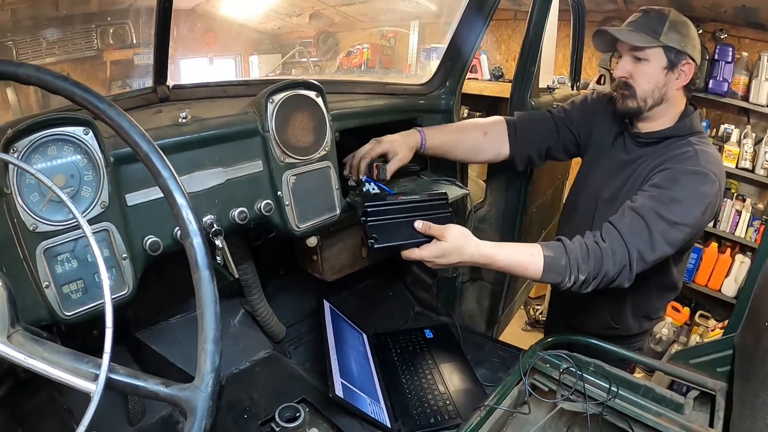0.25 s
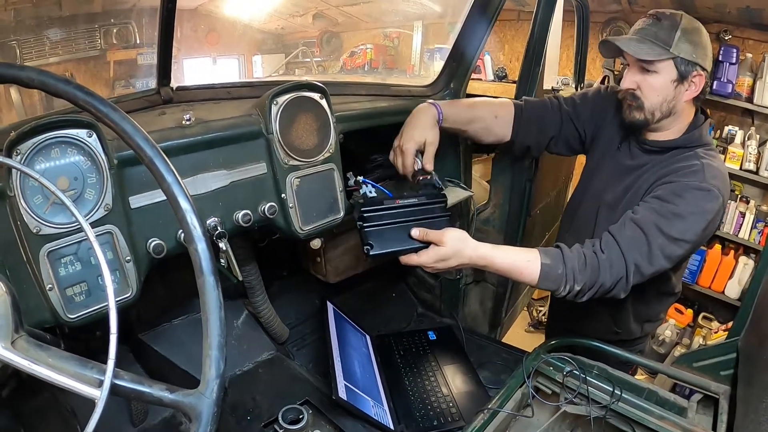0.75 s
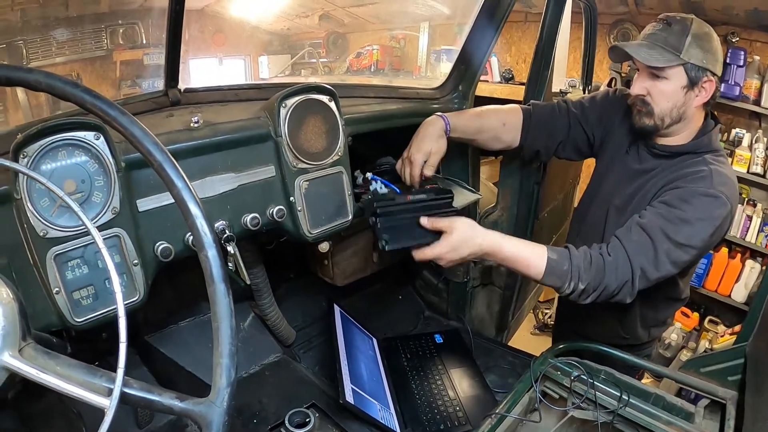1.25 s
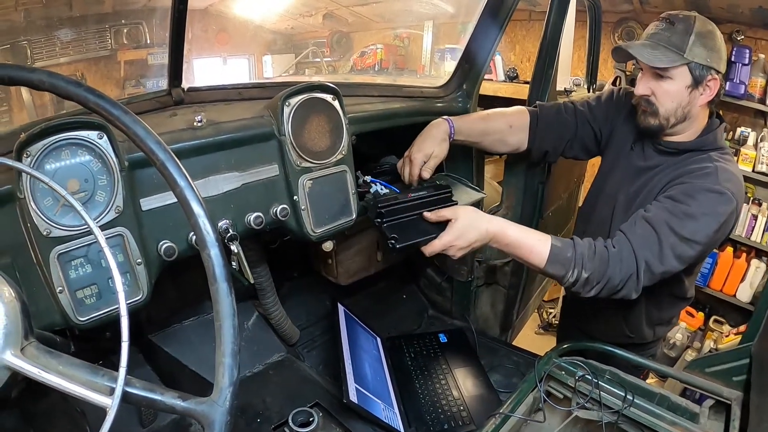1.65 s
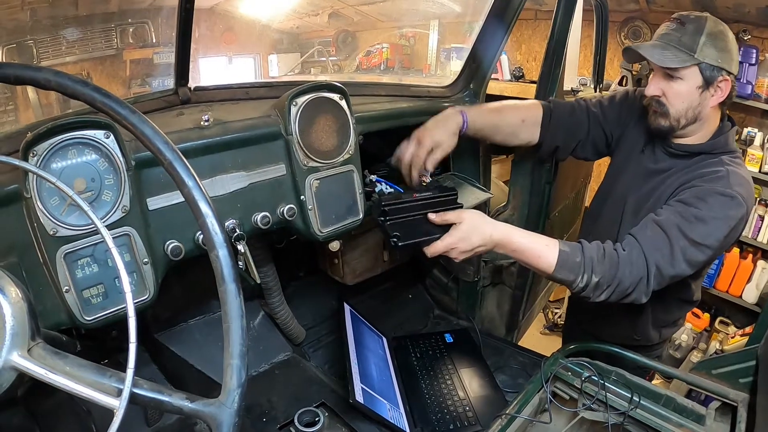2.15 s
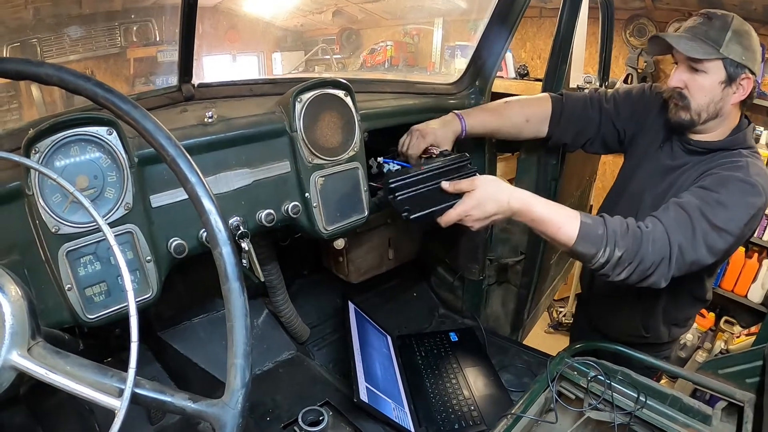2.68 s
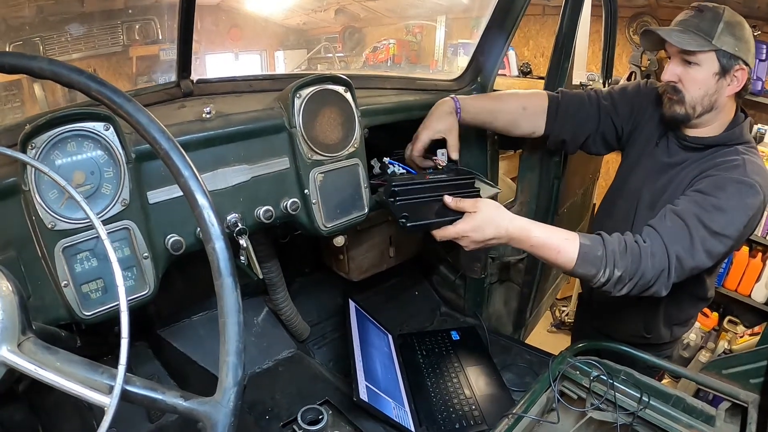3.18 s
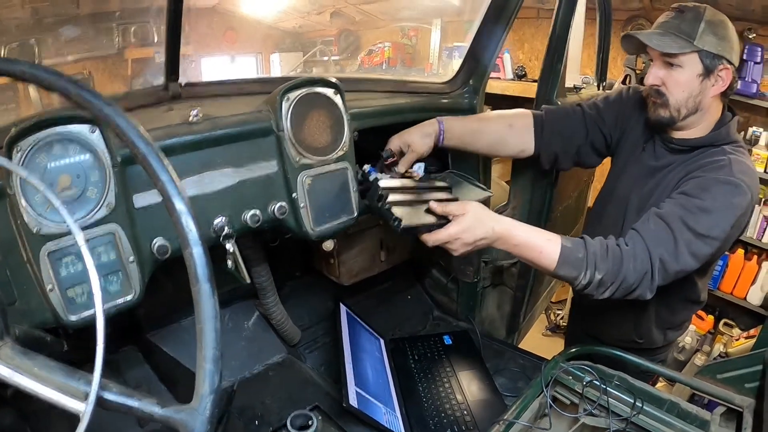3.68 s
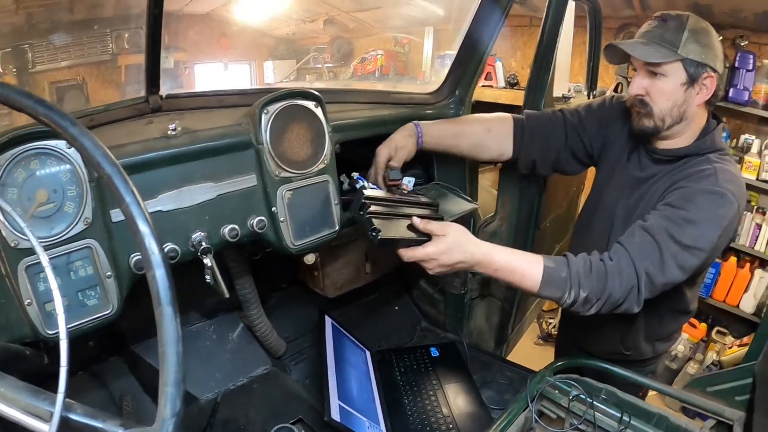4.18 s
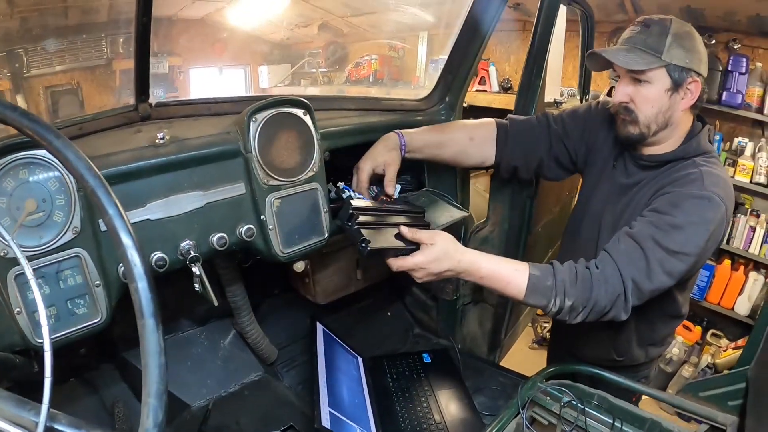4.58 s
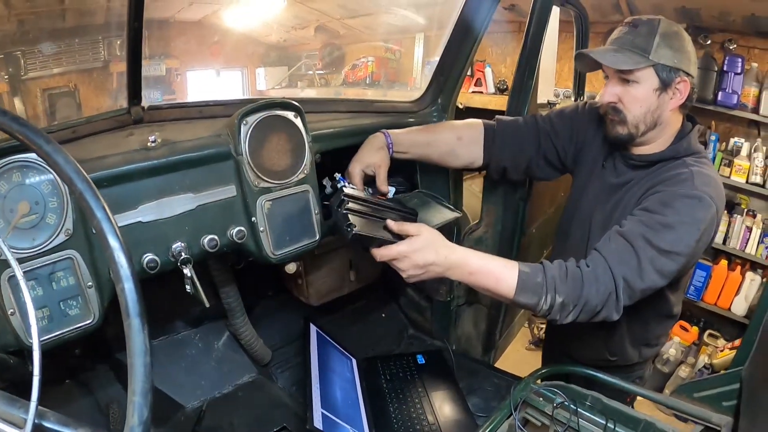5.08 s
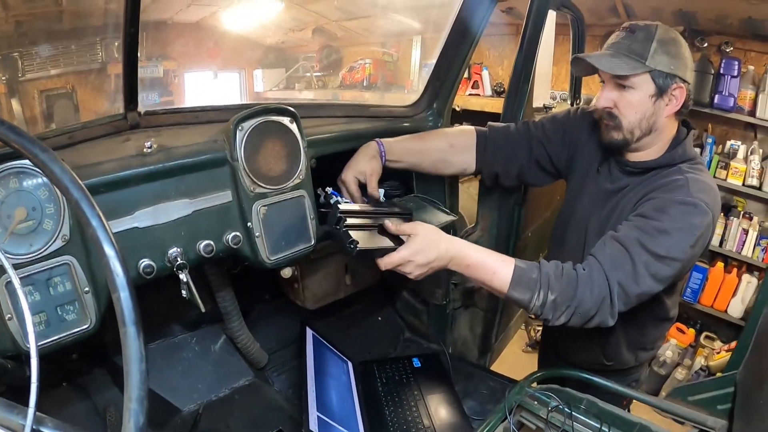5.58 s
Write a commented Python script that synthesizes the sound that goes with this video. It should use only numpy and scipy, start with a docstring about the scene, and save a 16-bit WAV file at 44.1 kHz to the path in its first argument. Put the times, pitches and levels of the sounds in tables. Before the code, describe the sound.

Close handling of plugs and wires: dull clacks, tiny latch ticks, brief rustling and low panel thumps in a hard, compact vehicle cab.

```python
"""Plastic wiring connectors are turned, tapped and pushed home on a control box inside an old steel truck cab.
A dull knock opens over rustling wires; a loose plug shell chatters before the first second ends.
To 3.4 s come knocks, latch slips and ticks, while the tugged harness makes the dash panels boom;
then a sparse stretch of faint slips, and from 4.5 s dense knocks, the strongest near 5.2 s, thinning to the end.
Shaped noise bursts excite resonances; the small hard cab answers every knock, over steady still air."""
import sys
import numpy as np
from scipy import signal
from scipy.fft import rfft, irfft, next_fast_len
from scipy.io import wavfile
from scipy.ndimage import map_coordinates

SR = 44100
rng = np.random.default_rng(int(sys.argv[2]) if len(sys.argv) > 2 else 0)


def log_audio(samples):
    """Write samples as a 16-bit WAV file to the path given in sys.argv[1]."""
    # one column per channel
    frames = np.atleast_2d(samples).T
    # limit to full scale, then quantise
    limited = np.clip(frames, -1, 1)
    pcm = np.round(limited * 32767).astype(np.int16)
    wavfile.write(sys.argv[1], SR, pcm)


N = 257544
LEAD = 512  # samples of silence ahead of each contact, room for the filters to ring early

# Sharp contacts: t/s, level/dB, loudest ring f/Hz, its lift/dB, box thud against the level/dB,
# brightness near 5 kHz/dB, rise time constant/s, nominal t60/s
KNOCKS = [(.003, -21.5, 1834, 2, 19, -22, 0.0028, 0.29), (0.32, -49, 1114, 18.5, -10, -1, 0.00026, 0.54),
          (0.525, -26.5, 1070, -2, 20, -8.5, 0.0019, 0.13), (.914, -9, 1370, -5, 9, -9.5, 0.0032, 0.25),
          (1.154, -17.5, 810, 12, -22, -21, 0.0013, 0.13), (1.163, -14, 1976, 10, -22, -19.5, 0.0036, 0.13),
          (1.233, -26, 844, 12, 22, -30, 0.00061, 0.13), (1.368, -19, 1400, 13.5, 14, -6, 0.0035, 0.14),
          (1.394, -25, 1576, 13.5, 1, -7, 0.0032, 0.18),
          (1.547, -15.5, 940, 7.5, 13.5, -22.5, 0.0005, 0.16),
          (1.808, -23.5, 1460, 10.5, 12, -11.5, 0.0015, 0.16),
          (1.831, -28, 6000, 16.5, -5.5, 6, 0.00066, .15),
          (2.022, -17.5, 1114, 2.5, 12.5, -23, 0.00058, 0.23),
          (2.258, -17.5, 1125, 4.5, 14, -22, 0.0023, 0.19), (2.855, -10, 1284, 6.5, 10, -9, 0.0017, 0.25),
          (2.946, -9, 1640, 5, 9.5, -14.5, 0.00055, 0.29), (3.185, -13, 810, 16, -48, -11.5, 0.00043, 0.17),
          (3.413, -26, 880, 13, -7, -2, 0.0009, 0.16), (4.468, -27.5, 3500, 8, 15.5, -8, 0.0013, 0.11),
          (4.492, -20.5, 820, 17.5, 4, -6.5, 0.0012, 0.14),
          (4.699, -19.5, 1203, 8.5, 19.5, -19.5, 0.001, 0.21),
          (4.739, -38, 3680, 2, 28, -3.5, 0.00058, 0.19), (4.916, -30.5, 5200, -13, 13.5, 1, 0.0031, 0.16),
          (4.926, -21, 1185, 11.5, 2.5, -13, 0.0013, 0.11),
          (5.063, -10.5, 2070, 10, -5.5, -16, 0.0027, 0.16),
          (5.172, -10.5, 820, 5.5, -19, -24.5, 0.00061, 0.21),
          (5.186, -6, 1250, 9.5, 10.5, -23, 0.0037, 0.19), (5.205, -21, 856, 12, 26.5, -20, 0.0021, 0.18),
          (5.485, -16.5, 1240, 7.5, 19, -27, 0.00099, 0.21),
          (5.834, -15.5, 1405, 0, -41, -20, 0.00076, 0.29)]
# Modes of the plastic housing, before scatter: f/Hz, width/Hz, level/dB
HOUSING = [(569.5, 30, -3.5), (579, 15, -4), (702, 12, -17.5), (867, 20, -2), (1050, 10, -7.5),
           (1269, 100, -7.5), (1331, 45, 2.5), (1395, 100, -7.5), (2010, 10, -4)]
# Modes of the hollow control box, before scatter: f/Hz, width/Hz, level/dB
BOX = [(227.3, 16, -5.5), (292.5, 12.2, 3), (351, 26, -6), (436, 6.3, -3)]
# Spectrum of a knock: f/Hz, level/dB, share of the brightness added
KNOCK_COLOUR = [(250, -20, 0.38), (526, -8.5, 0), (940, -3.5, 0.0097), (2030, 0.7, 0.58),
                (4620, -1.5, 0.93), (9700, -3, 1.14), (13980, -12.5, 2.8)]
# Treble slope of a snap, also used by slips and chatter: f/Hz, level/dB
TREBLE = [(4000, 6.5), (6300, -0.5), (8000, -5), (12000, -9), (16000, -27.5)]
# The loudest ring is a pair: distance from its centre and width, as shares of the pitch
RING_SPLIT, RING_WIDTH = 0.064, 0.045


def knocks():
    """Modal excitation: a blow rings the housing, most near its loudest mode, and thuds in the hollow box."""
    out = np.zeros((2, N + LEAD))
    for s, db, ring_hz, ring_db, thud_db, bright_db, rise, t60 in KNOCKS:
        near = []
        for hz, width, level in HOUSING:
            octaves_away = abs(np.log2(hz / ring_hz))
            near.append((hz * (1 + .03 * rng.standard_normal()), width, level - 2.0 * octaves_away))
        pair = [(ring_hz * (1 + side * RING_SPLIT), RING_WIDTH * ring_hz, ring_db) for side in (-1, 1)]
        housing = modal(near, scatter_db=-1.5)
        loudest = modal(pair, scatter_db=1.5)
        parts = small_parts(count=14)
        box = modal(BOX, scatter_db=-0.7)
        # a dull blow loses the top treble fastest
        colour = [(hz, level_db + share * bright_db) for hz, level_db, share in KNOCK_COLOUR]

        def response(hz):
            rings = 1 + amp(7.5) * housing(hz) + loudest(hz) + parts(hz)
            return amp(along(colour, hz) + along(TREBLE, hz)) * rings

        burst = crackle(cab(.4, rise, t60), depth_db=0.4, size=130)
        clack = filtered(burst, response)
        thud = filtered(cab(.4, 0.006 + 2.0 * rise, 0.18), box)  # the box wall takes a moment to move
        add(out, s, amp(db) * spread(clack + amp(thud_db) * thud))
    return out[:, LEAD:]


# Short slips and ticks of wire or latch: t/s, level/dB, centre f/Hz, half-width to -6 dB/octaves, nominal t60/s
SLIPS = [(.106, -53, 1340, 2.5, 0.263), (.381, -45.5, 3670, 1.04, 0.37), (0.448, -36.5, 4310, 6.3, 0.45),
         (.47, -48.5, 1100, 0.46, 0.9), (1.05, -41, 960, 0.71, 0.098), (1.251, -39, 1300, 0.32, .12),
         (1.29, -43.5, 1110, 0.52, 0.19), (1.328, -39, 3500, 1.7, 0.41), (1.339, -42, 1010, 0.91, 0.19),
         (1.366, -33.5, 4620, 0.32, 0.165), (1.486, -33, 7700, 0.56, 0.14), (1.653, -52.5, 970, 0.48, 0.12),
         (2.072, -54, 3500, 1.4, 0.56), (2.128, -40, 3250, 1.9, .24), (2.184, -43, 2800, 0.84, .1),
         (2.23, -52, 2200, 0.88, .25), (2.315, -39.5, 6960, 4.4, 0.36), (2.352, -43, 1830, 0.31, 0.11),
         (2.356, -43.5, 5240, 0.48, 0.1), (2.58, -39.5, 3020, 2.6, 0.33), (2.662, -50.5, 1510, 0.51, .095),
         (2.777, -58, 1130, 0.38, 0.84), (2.788, -47.5, 6900, 0.74, 0.32), (3.016, -24.5, 6050, 0.55, 0.16),
         (3.018, -37.5, 12000, .6, 0.18), (3.067, -43, 8950, 0.66, 0.25), (3.124, -49.5, 5700, 0.26, 0.17),
         (3.32, -48.5, 7500, 0.68, .18), (3.367, -43, 2920, 5.6, 0.27), (3.573, -61, 4260, 0.42, .11),
         (3.732, -66, 1560, 0.56, 0.15), (3.881, -65, 7000, 1, 0.23), (3.91, -55.5, 6100, 0.43, 0.11),
         (4.023, -55.5, 4700, 2.3, 0.39), (4.272, -67, 1100, .6, 0.14), (4.314, -64.5, 6260, 0.99, 0.46),
         (4.421, -49.5, 3500, 1.3, 0.12), (4.442, -48, 1480, 1.7, 0.18), (4.643, -58, 1230, 0.51, 0.3),
         (4.779, -47, 5700, 1.4, 0.3), (4.811, -45, 1760, 4.5, 0.13), (4.867, -55, 1940, 1.7, 0.36),
         (5.299, -42.5, 7250, 0.52, 0.163), (5.381, -54, 6900, 0.29, 0.088),
         (5.423, -52, 7000, 0.59, 0.098), (5.525, -38, 409, 0.096, 0.23), (5.587, -54.5, 6100, 0.94, 0.22),
         (5.724, -57, 1004, 0.58, 0.72), (5.812, -43.5, 6800, 0.62, 0.34)]
SLIP_RISE = 0.023  # rise time constant as a share of the t60


def slips():
    """Stick-slip friction: each slip is a gritty, stuttering noise burst in one broad band."""
    out = np.zeros((2, N + LEAD))
    for s, db, centre_hz, octaves, t60 in SLIPS:
        parts = small_parts(count=14)
        burst = crackle(cab(1.0, SLIP_RISE * t60, t60), depth_db=1.5, size=180)

        def response(hz):
            skirt_db = -6 * abs(np.log2((hz + 1) / centre_hz) / octaves) ** 1.5
            band = amp(skirt_db + 0.65 * along(TREBLE, hz))
            evened = band / np.sqrt(centre_hz * abs(octaves) / SR)  # a wider band gets less level per Hz
            return evened * (1 + amp(3) * parts(hz))

        add(out, s, amp(db) * spread(filtered(burst, response)))
    return out[:, LEAD:]


# Taps of the loose plug shell: t/s, level/dB
CHATTER = [(0.4579, -39.5), (0.48, -40.5), (0.636, -31), (0.6884, -35.5), (0.745, -40.5), (0.7846, -36.5),
           (0.855, -32.5)]
# Modes of the shell, before grip and scatter: f/Hz, width/Hz, level/dB
SHELL = [(1660, 180, 0), (1832, 35, 6.5), (2335, 87, -4.5), (2700, 480, -2), (2940, 120, 1),
         (3970, 60, -11), (4225, 140, -5), (4650, 62, -10.5), (6040, 280, -6), (6280, 80, -10),
         (8300, 250, -16.5)]


def chatter():
    """Free vibration: the loose shell rings on its own modes at each tap; the grip detunes them a little."""
    out = np.zeros((2, N + LEAD))
    for s, db in CHATTER:
        grip = 1 + .008 * rng.standard_normal(len(SHELL))
        gripped = [(hz * g, width, level) for g, (hz, width, level) in zip(grip, SHELL)]
        shell = modal(gripped, scatter_db=1.5)

        def response(hz):
            direct = amp(along([(800, -31.0), (2000, -8.0)], hz) + along(TREBLE, hz))
            return direct + amp(17.0) * shell(hz)

        burst = crackle(cab(0.5, 0.00052, 0.22), depth_db=0.0, size=130)
        add(out, s, amp(db) * spread(filtered(burst, response)))
    return out[:, LEAD:]


# The dash under the pull of the harness: t/s, deep panel level/dB, upper panel level/dB
TUG = [(0.0, -54.5, -47), (0.96, -43, -35), (1.14, -26, -34.5), (1.2, -41.5, -39), (1.45, -30, -35),
       (1.54, -39, -44), (1.59, -34, -27.5), (1.8, -49.5, -45), (1.85, -28.5, -35), (1.95, -51, -42.5),
       (2.2, -37.5, -36.5), (2.8, -52, -55), (2.94, -42, -39), (3.79, -72.5, -67), (4.1, -51.5, -55),
       (4.34, -89.5, -77.5), (4.52, -28.5, -29.5), (4.62, -45.5, -44), (4.78, -43, -38), (5.16, -38, -48),
       (5.219, -30, -25.5), (5.43, -40, -43), (5.53, -40.5, -34.5), (5.84, -41.5, -54.5)]
# Low modes of the deep panel: f/Hz, width/Hz, level/dB
DEEP = [(43, 34, -15), (60, 15.3, -2), (71.6, 23, -7)]
# Low modes of the upper panel: f/Hz, width/Hz, level/dB
UPPER = [(139.8, 20.1, 3.5), (166.7, 51.1, -2.5), (235, 41, -10.5)]


def dash():
    """Forced vibration: uneven pulls, as noise, keep the steel panels booming on their low modes."""
    out = np.zeros((2, N))
    jerk = amp(1.7 * wobble(9))
    for db, modes in zip(curves(TUG), (DEEP, UPPER)):
        boom = filtered(jerk * rng.standard_normal((2, N)), modal(modes))
        out += amp(db) * unit(spread(boom))
    return out


# Catches per second, their fading time constant/s, their power weight over the even rub
CATCH_RATE, CATCH_S, CATCH_POWER = 50, .012, 1.2


def rubbing(spectrum, clumps):
    """Friction noise: tiny uneven slips in clumps (dB); now and then a wire catches and lets go."""
    catches = (rng.random(N) < CATCH_RATE / SR) * rng.exponential(size=N) ** 2
    fading = signal.lfilter([1], [1, -np.exp(-1 / (CATCH_S * SR))], catches)
    uneven = amp(clumps + .8 * rng.exponential(size=N))
    grit = np.sqrt(1 + CATCH_POWER * fading) * uneven * rng.standard_normal((2, N))
    return unit(spread(filtered(grit, lambda hz: amp(along(spectrum, hz)))))


# Wires and sleeve: t/s, scrape level/dB
RUSTLE = [(0, -24.5), (.2, -63.5), (.3, -69), (.55, -49), (1.0, -42), (1.3, -48.5), (1.52, -58.5),
          (1.98, -54), (2.3, -44.5), (2.56, -52), (2.61, -40.5), (2.73, -55.5), (2.84, -57.5), (3.05, -53),
          (3.3, -53), (3.58, -67), (4.38, -69), (4.8, -63), (5.02, -63), (5.35, -61), (5.65, -60.5),
          (5.84, -58)]
# Scrape spectrum before the housing modes: f/Hz, relative level per Hz/dB
SCRAPE = [(200, 2.5), (400, -1.5), (1100, -5), (2000, -6), (6000, -15), (10000, -59.5)]
# Hiss spectrum: f/Hz, relative level per Hz/dB
HISS = [(1800, -28.5), (3000, 0), (5500, -0.5), (9000, 0), (12500, -20), (16000, -45.5)]
HISS_DB, HISS_GROWS = -68.5, 0.7  # mean level/dB; its swing against that of the scrape


def wires():
    """Friction coupled to a resonator: wires scrape on the box, housing modes ring, fingers add hiss."""
    scrape_db, = curves(RUSTLE)
    hiss_db = HISS_DB + HISS_GROWS * (scrape_db - scrape_db.mean())
    clumps = 2.5 * wobble(12) + 1.5 * wobble(35)
    body = modal(HOUSING)
    scrape = unit(filtered(rubbing(SCRAPE, clumps), lambda hz: 1 + amp(7.0) * body(hz)))
    hiss = rubbing(HISS, clumps + 6.9 * wobble(6.8))
    return amp(scrape_db) * scrape + amp(hiss_db) * hiss


# Spectrum of the quiet workshop: f/Hz, relative level per Hz/dB
AIR = [(15, -24.5), (25, 14), (153, -9), (695, -27.5), (1130, -17.5), (2760, -49), (3620, -20),
       (3920, -23.5), (16000, -38)]
AIR_DB = -63.5


def workshop():
    """Stationary random noise: still air with a fixed spectrum."""
    air = filtered(rng.standard_normal((2, N)), lambda hz: amp(along(AIR, hz)))
    return amp(AIR_DB) * unit(spread(air))


# Decay in the cab: f/Hz, decay time against that of the contact
CAB = [(300, 1.98), (600, 1.01), (900, 0.96), (14000, 0.64)]


def cab(length, rise, t60):
    """Reverberation: a contact and its dense echoes, noise that swells, then decays at a rate set by frequency."""
    t = np.arange(int(length * SR)) / SR
    hz, s, z = signal.stft(rng.standard_normal((2, len(t))), SR, nperseg=128)
    decay = amp(-60 * s / (abs(t60) * along(CAB, hz)[:, None]))
    tail = signal.istft(z * decay, SR, nperseg=128)[1][:, :len(t)]
    rise = max(rise, 1e-4)
    crack = 1 + 0.00086 / rise * np.exp(-t / 0.00044)  # the harder the contact, the more its direct sound stands out
    swell = (1 - np.exp(-t / rise)) ** 2
    return np.pad(tail * crack * swell, [(0, 0), (LEAD, 0)])


def modal(modes, scatter_db=0):
    """Modal superposition: the causal response of a few resonances, with gains scattered anew for each use."""
    gains = amp(np.transpose(modes)[2] + scatter_db * rng.standard_normal(len(modes)))

    def response(f):
        total = 0
        for k, (centre, width, _) in enumerate(modes):
            resonance = 1j * f * width / (centre * centre - f * f + 1j * f * abs(width))
            total = total + (-1) ** k * gains[k] * resonance  # neighbours alternate in sign
        return total

    return response


def small_parts(count):
    """Local resonance: pins, clips and ribs answer each contact with a new handful of weak modes."""
    hz = np.sort(600 * 10 ** rng.random(count))
    return modal(np.transpose([hz, .045 * hz, np.zeros(count)]), scatter_db=3)


def crackle(x, depth_db, size):
    """Intermittent contact: breaks a burst into uneven sub-contacts of size samples."""
    steps = np.repeat(rng.standard_normal(x.shape[1] // size + 1), size)[:x.shape[1]]
    return x * amp(depth_db * steps)


# Likeness of left and right: f/Hz, correlation
ALIKE = [(100, .995), (300, .97), (600, .88), (1500, .85), (4000, .66), (10000, .42)]


def spread(pair):
    """Interchannel coherence: two unrelated signals become left and right, alike in the bass, apart in the treble."""
    def weights(hz):
        turn = np.arccos(np.clip(along(ALIKE, hz), -1, 1)) / 2
        return np.array([np.cos(turn), np.sin(turn)])

    mid, side = filtered(pair, weights)
    return np.array([mid + side, mid - side])


def amp(db):
    """Level law: decibels to an amplitude ratio."""
    return 10 ** (np.asarray(db) / 20)


def unit(x):
    """Normalisation to unit root-mean-square."""
    return x / np.sqrt(np.mean(x ** 2) + 1e-20)


def along(points, hz):
    """Linear interpolation of (f/Hz, value) points on a logarithmic frequency axis."""
    f, v = np.transpose(points)
    return np.interp(np.log(hz + 1), np.log(f + 1), v)


def curves(rows):
    """Linear interpolation in time: one value per sample for each column after t/s."""
    s, *cols = np.transpose(rows)
    return [np.interp(np.arange(N) / SR, s, c) for c in cols]


def wobble(rate):
    """Band-limited randomness: a smooth random curve with rate knots a second."""
    knots = rng.standard_normal(int(N * rate / SR) + 4)
    return map_coordinates(knots, [np.arange(N) * rate / SR])


def filtered(x, response):
    """Linear filtering: the spectrum of x times a complex response of frequency."""
    m = next_fast_len(x.shape[-1] + 4096)
    return irfft(rfft(x, m) * response(np.fft.rfftfreq(m, 1 / SR)), m)[..., :x.shape[-1]]


def add(out, s, x):
    """Superposition: lays in a short sound that starts LEAD samples before time s."""
    part = out[:, round(s * SR):][:, :x.shape[1]]
    part += x[:, :part.shape[1]]


def scene():
    """Superposition of everything in the cab."""
    return knocks() + slips() + chatter() + dash() + wires() + workshop()


# Balance of the microphone pair: f/Hz, left-right level/dB
LEAN = [(200, 2), (600, 1), (2000, 4), (5000, 1), (14000, 0)]
TOP_HZ = 15900  # upper band limit


def record(dry):
    """Interchannel level and time difference: the left microphone hears one sample late; the band is limited."""
    half = np.array([[.5], [-.5]])

    def response(hz):
        delay = np.exp(-2j * np.pi * half * hz / SR)
        return amp(half * along(LEAN, hz)) * delay * (hz < TOP_HZ)

    return filtered(dry, response)


dry = scene()
out = record(dry)
log_audio(out)
```